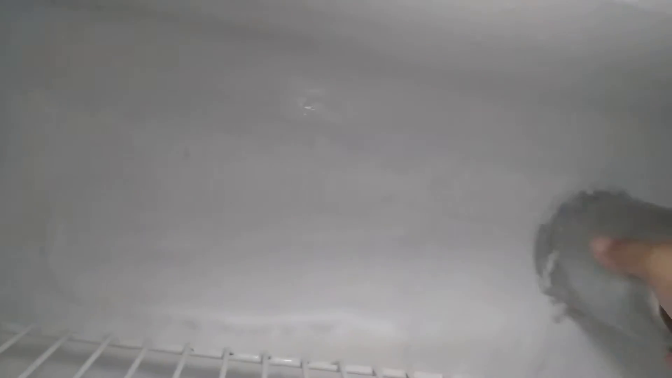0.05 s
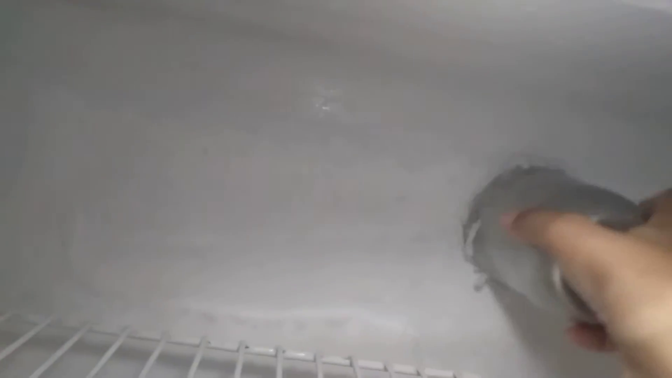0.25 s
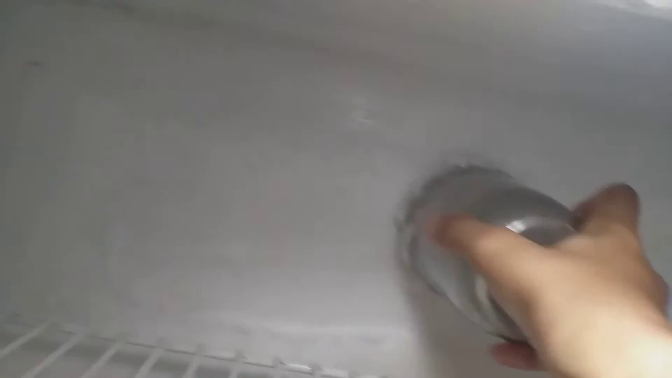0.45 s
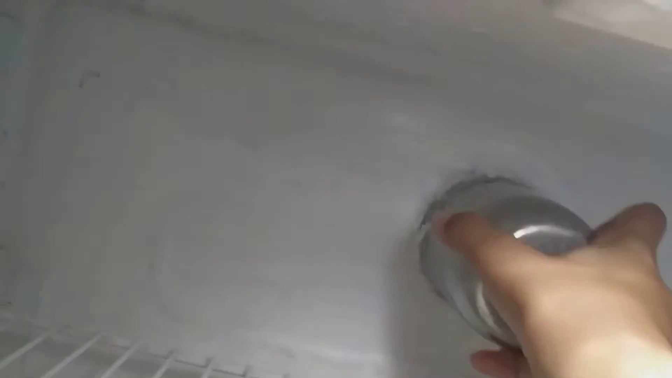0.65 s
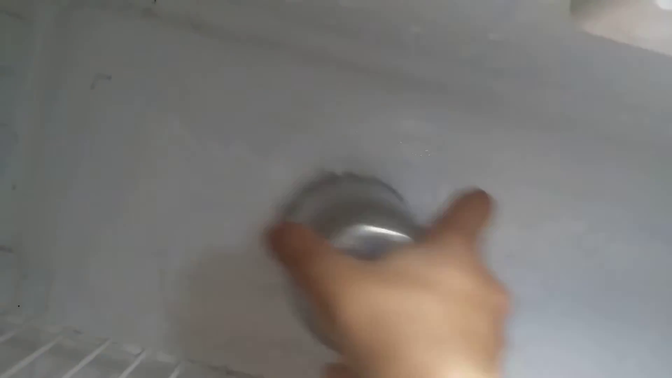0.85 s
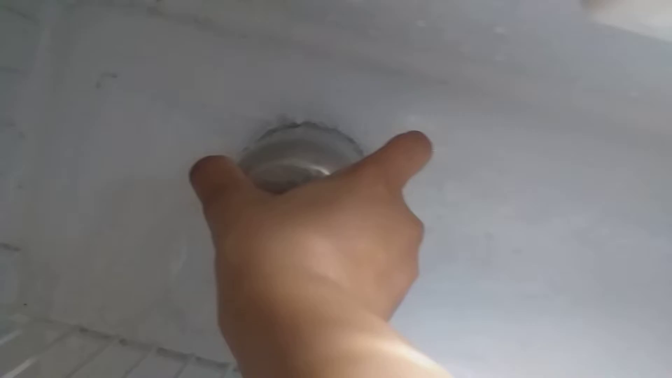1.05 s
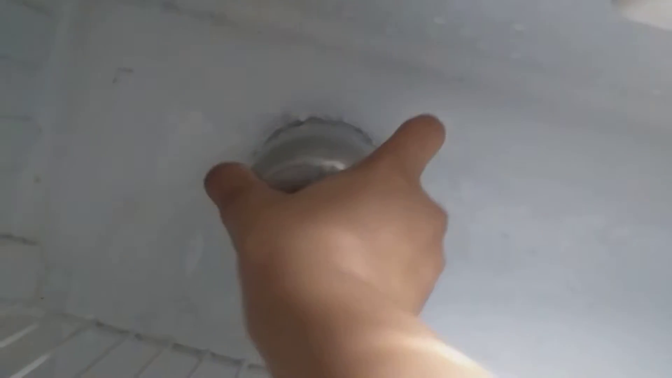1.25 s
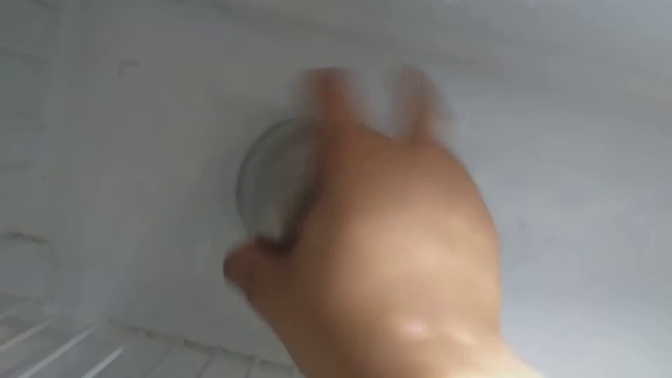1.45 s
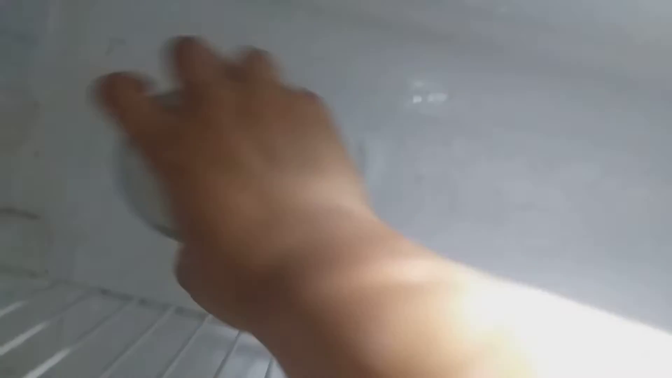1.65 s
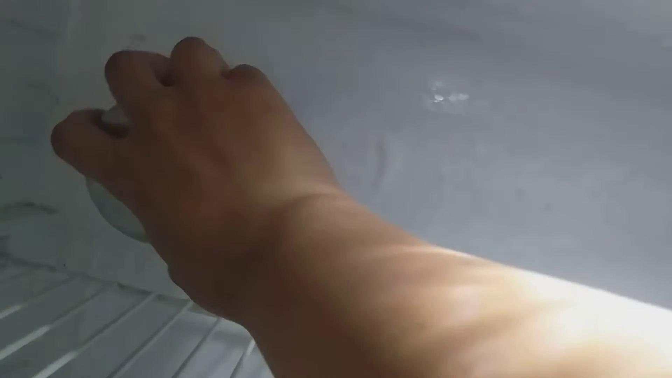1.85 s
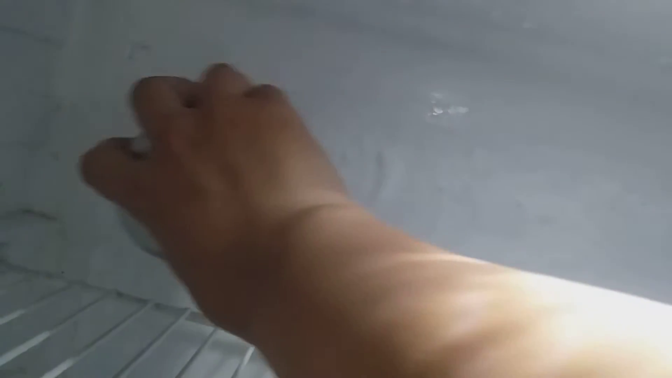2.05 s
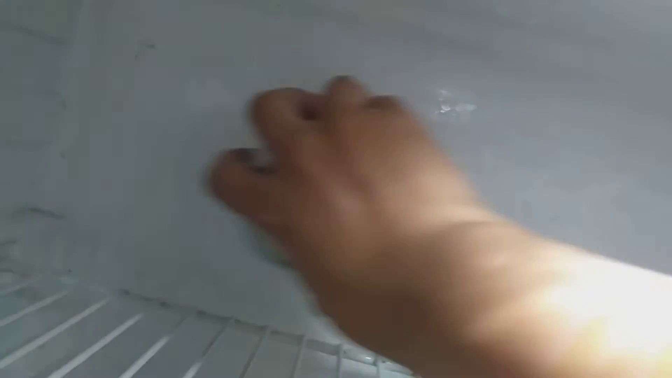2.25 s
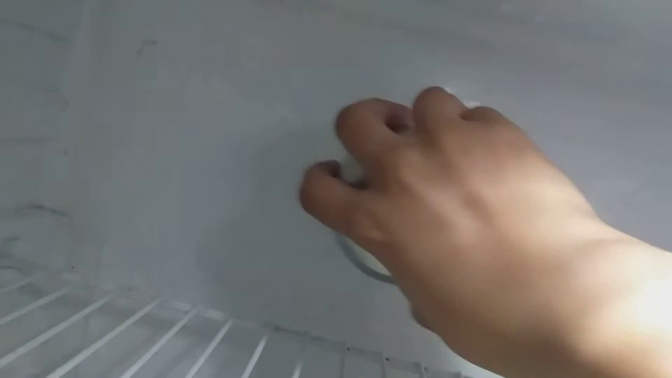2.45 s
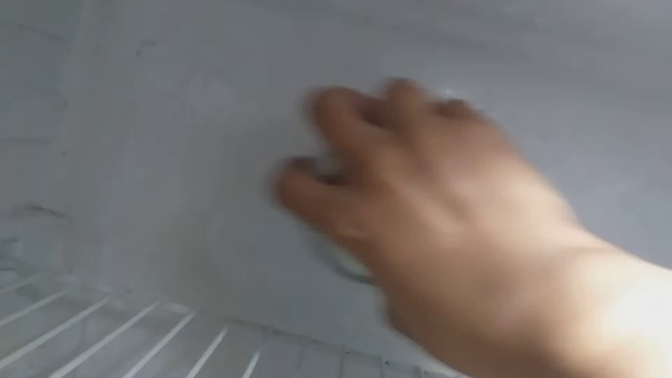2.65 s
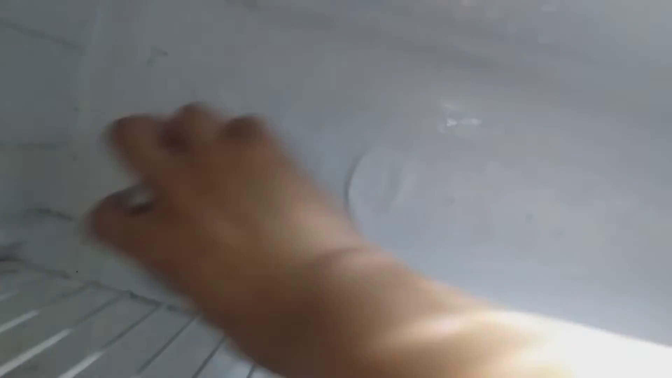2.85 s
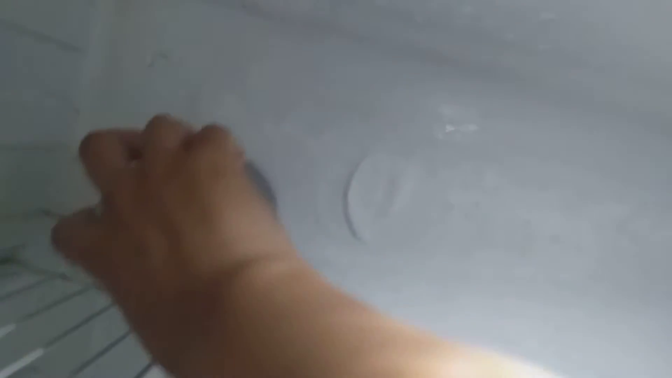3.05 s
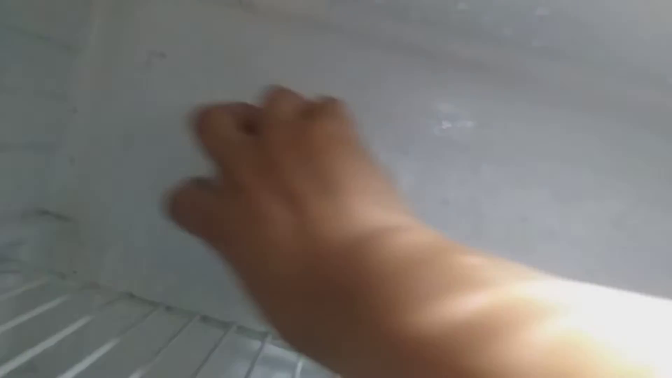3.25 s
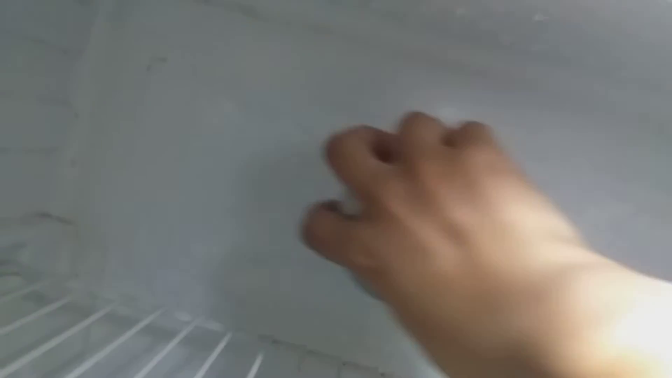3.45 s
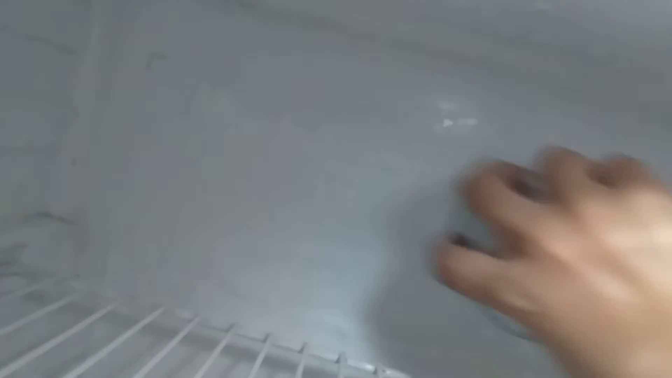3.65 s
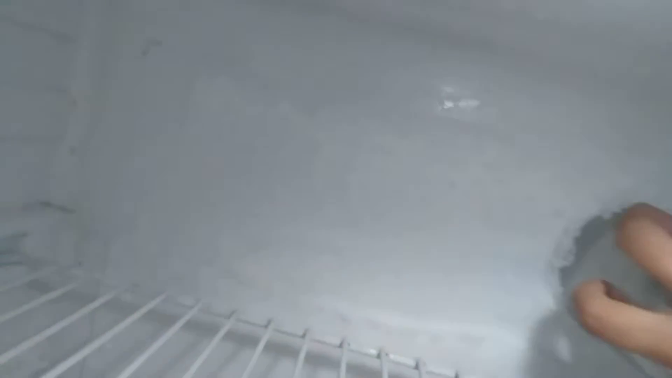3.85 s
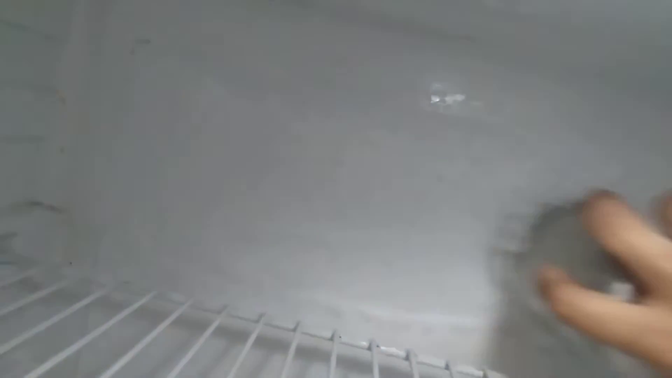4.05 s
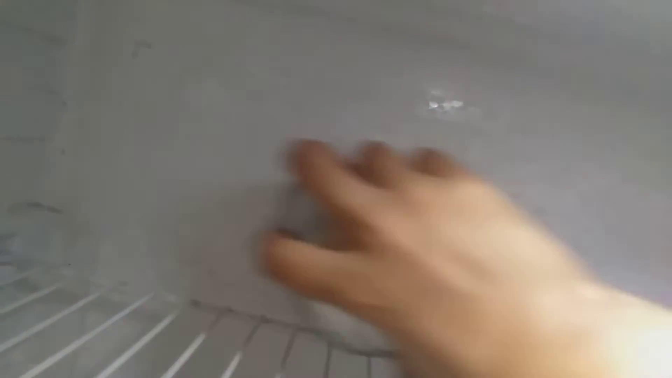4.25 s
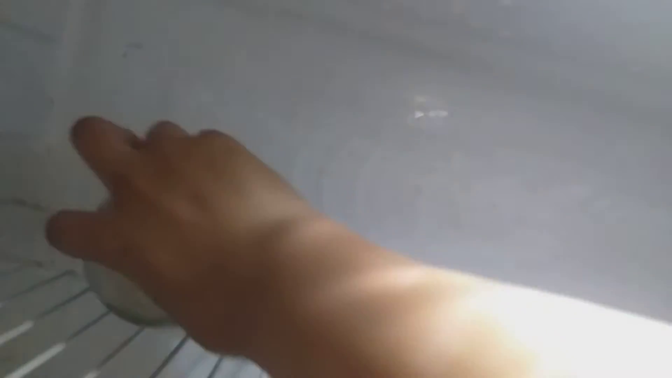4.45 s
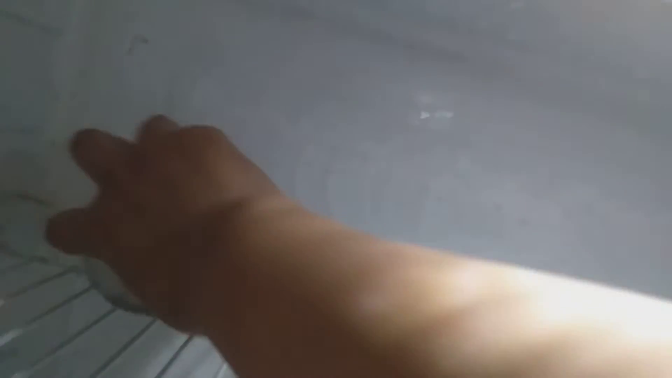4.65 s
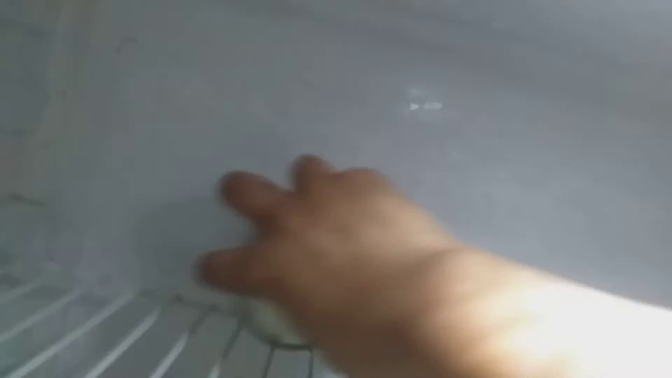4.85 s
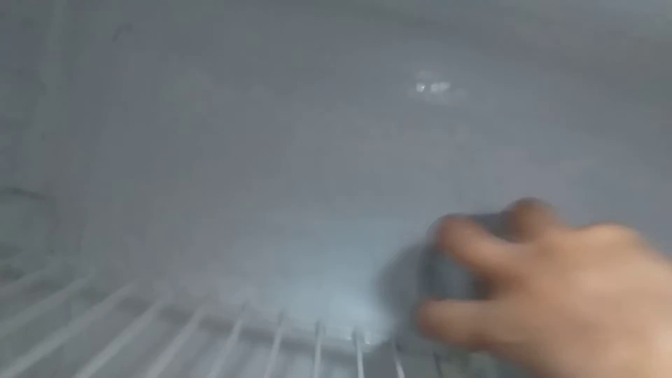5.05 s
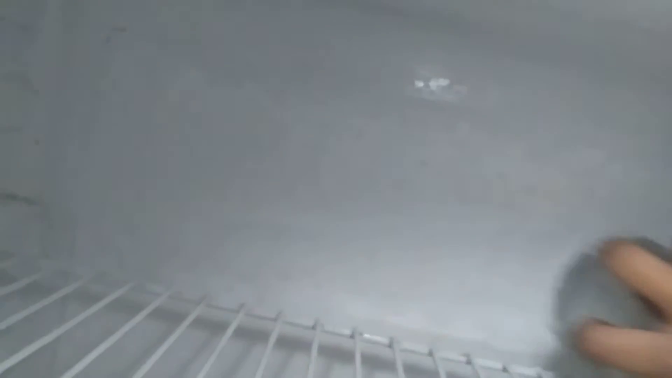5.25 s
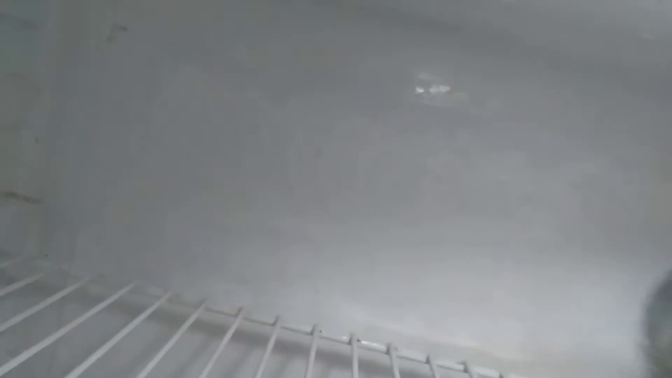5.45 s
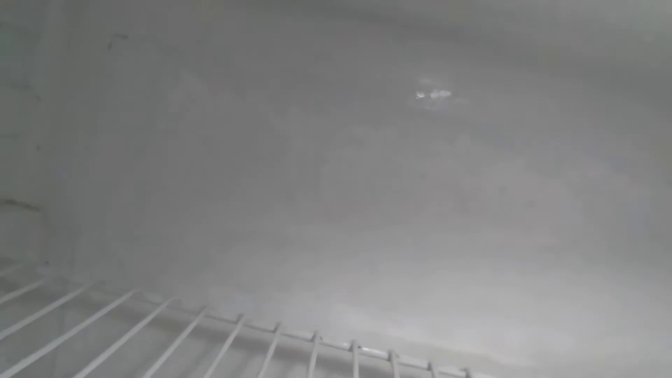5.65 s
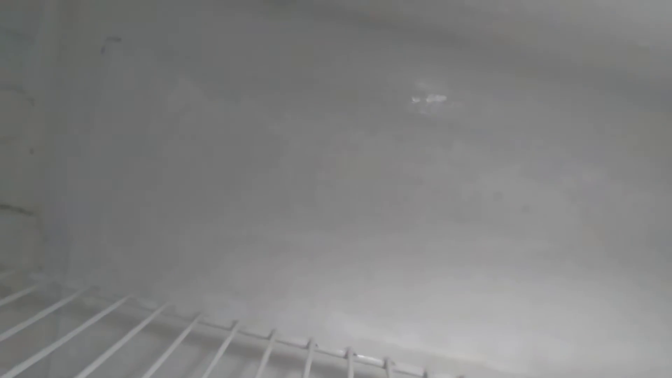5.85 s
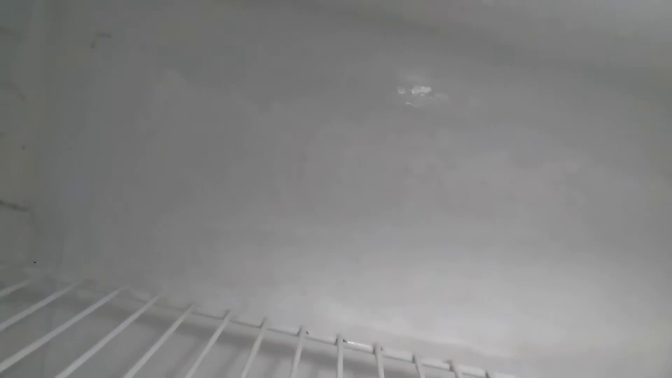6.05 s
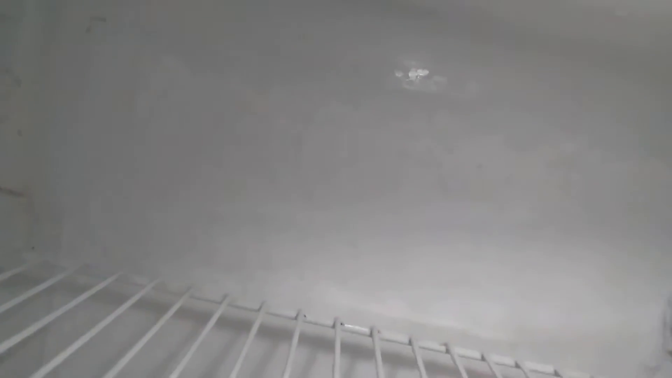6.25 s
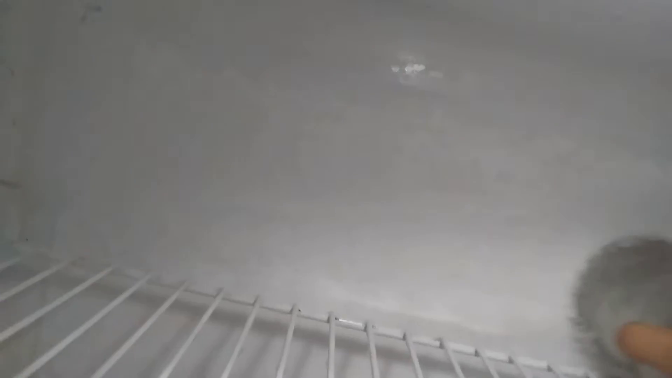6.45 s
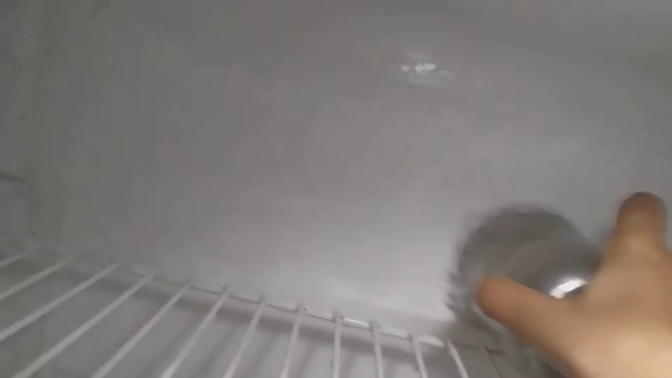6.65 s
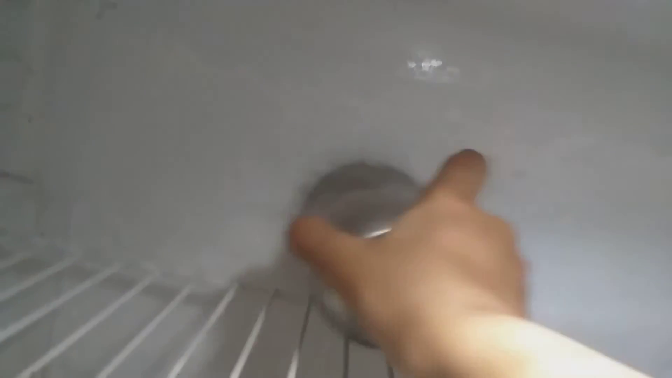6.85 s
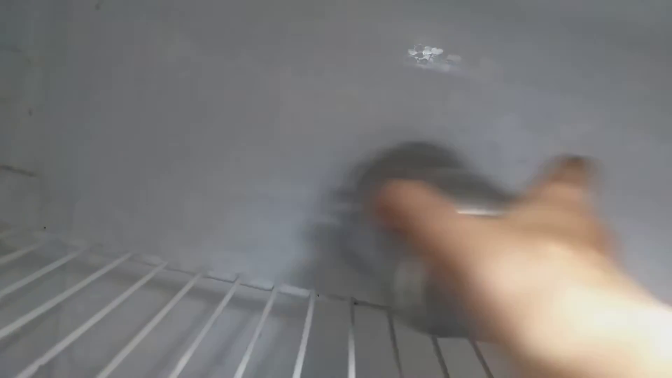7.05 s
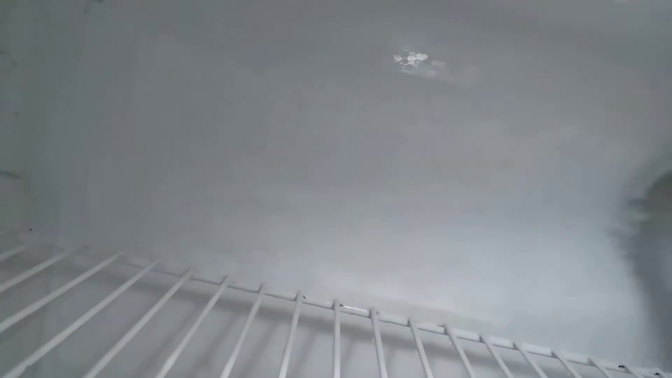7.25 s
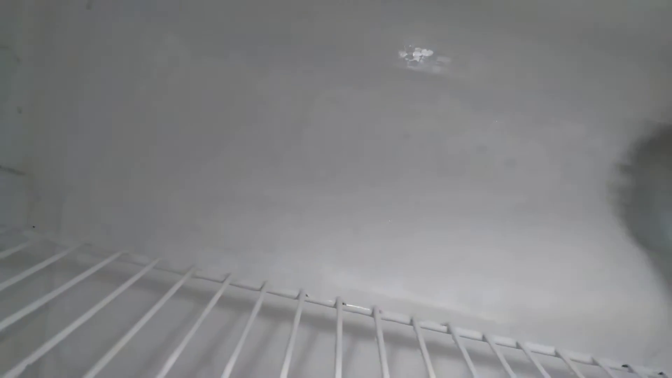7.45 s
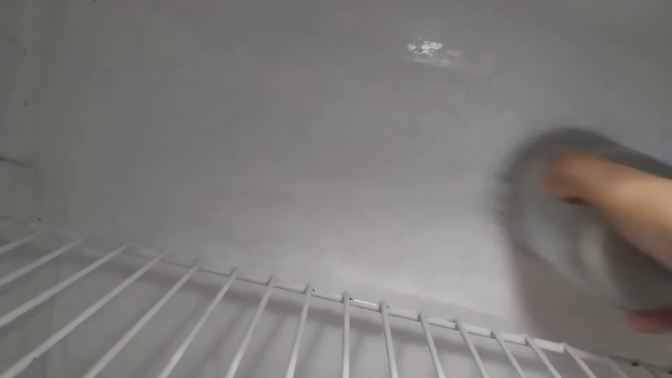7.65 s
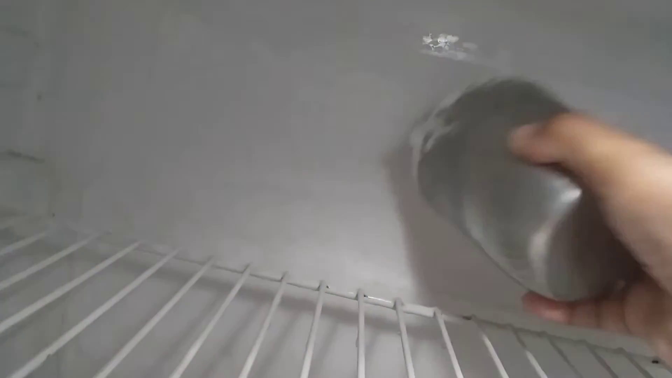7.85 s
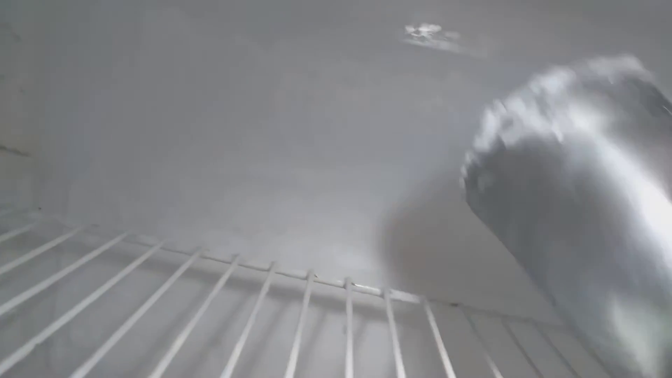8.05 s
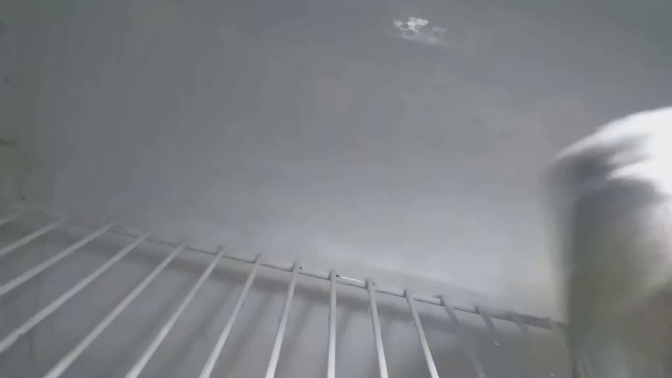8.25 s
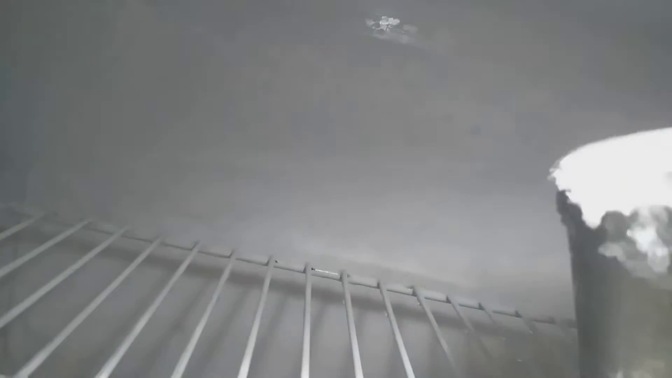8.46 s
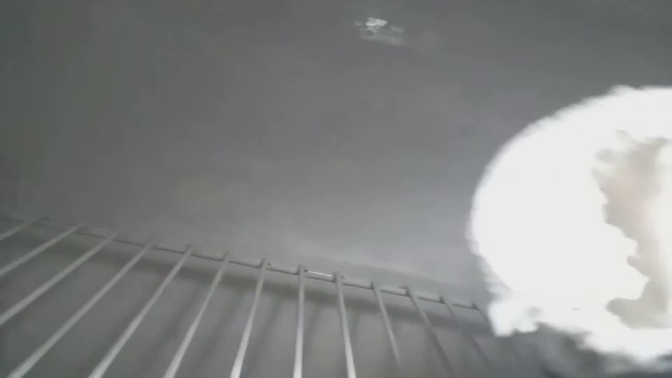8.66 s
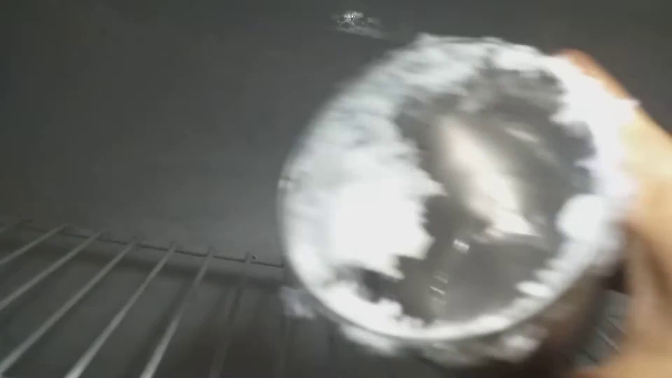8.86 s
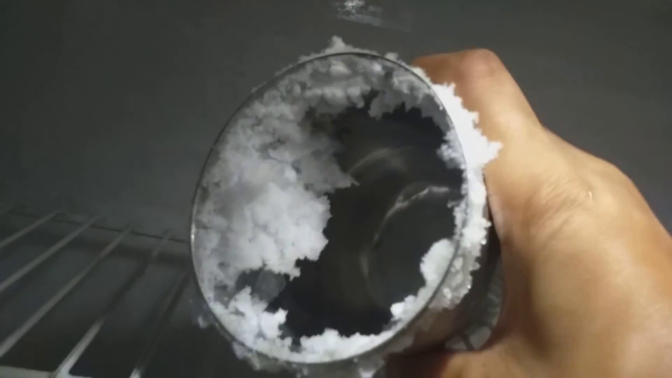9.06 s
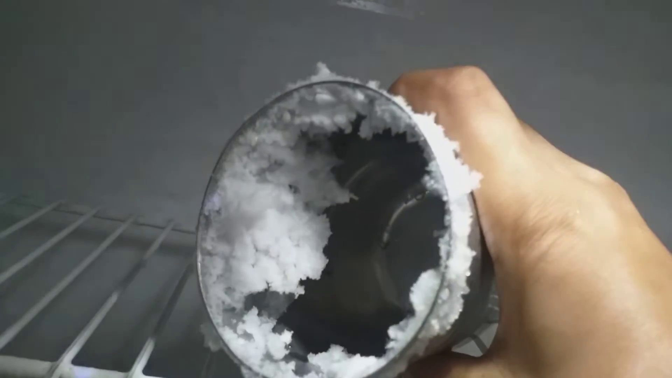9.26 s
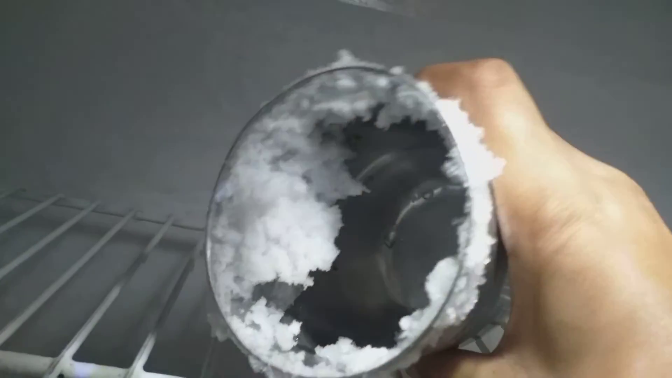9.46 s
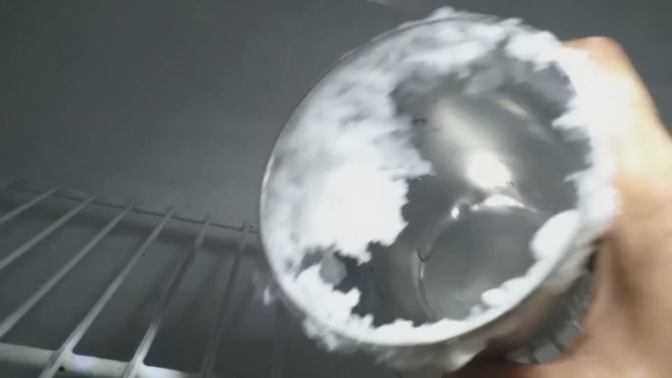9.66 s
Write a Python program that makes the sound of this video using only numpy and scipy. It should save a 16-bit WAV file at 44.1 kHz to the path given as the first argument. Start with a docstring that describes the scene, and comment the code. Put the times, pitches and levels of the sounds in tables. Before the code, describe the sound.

A metal cup scrapes frost from a freezer's inner wall, heard very close in a tight, reflective compartment with a faint dull room tail. From 0 to 1 s come short powdery crunches with hollow panel rumble, cracks and knocks. A bump at 1.7 s starts lighter, sparser rasping, with more scraping and a click or two near 2-2.6 s. Around 3-3.8 s a fuller crunchy stroke breaks into quick slips and a short high squeak at 3.5 s, then a thump. After a lull, brittle cracks at 4.4 s lead to the loudest, harshest scraping at 4.7-5.3 s. Smaller scrapes and bumps follow, then another strong crackling rasp at 6.2-6.9 s, with a thin squeak. Brief soft crunches and knocks at 7.3-7.8 s fade. Near 8.1-8.3 s faint finger taps make the cup ring slightly. Only low compressor hum and soft hiss remain, rising a little after 9 s.

```python
"""A metal cup is dragged over the frosted inner wall of a freezer, close to the microphone: random clicks
of crushed ice, heard directly and through the ringing modes of the cup. The rim sticks, slips and squeaks.
Friction and bumps excite the modes of the hollow plastic wall; bumps clack and finger taps ring the cup.
Noise tails echo it from compartment and kitchen, over compressor harmonics and hiss; the cup lifts off at the end."""
import sys
import numpy as np
from scipy import signal
from scipy.fft import rfft, irfft
from scipy.io import wavfile
from scipy.ndimage import uniform_filter1d, minimum_filter1d, map_coordinates

SR = 44100
rng = np.random.default_rng(int(sys.argv[2]) if len(sys.argv) > 2 else 0)


def output_pcm(signal):
    """Save a mono or channel-first signal as 16-bit PCM at the path in sys.argv[1].

    Samples are clipped to [-1, 1] before scaling.
    """
    pcm = np.clip(np.atleast_2d(signal).T, -1, 1) * 32767
    wavfile.write(sys.argv[1], SR, np.round(pcm).astype(np.int16))


N = 428211
T = np.arange(N) / SR  # time_s

# All table levels are relative.
# Pushes of the rim over the frost: start_s, rise_s, hold_s, fall_s, crunch_db, rumble_db,
# hardness (0 powder .. 1 glassy crust)
PUSHES = [(0.049, 0.05, 0.17, 0.21, -23, -19, 0.021), (0.381, 0.13, 0.027, 0.092, -21.5, -19, 0.13),
          (0.697, 0.076, 0.1, 0.21, -25.5, -15, 0.024), (0.946, 0.073, 0.02, 0.033, -29, -24, 0.033),
          (1.713, 0.04, 0.014, 0.073, -34.5, -32, 0.36), (2.006, 0.29, 0.2, 0.06, -26.5, -27.5, 0.4),
          (2.527, 0.051, 0.051, 0.06, -44.5, -44.5, 0.22), (2.97, 0.35, .13, .2, -23.5, -24, 0.39),
          (3.298, 0.13, 0.22, 0.31, -20.5, -16, 0.05), (4.408, 0.026, 0.0079, 0.047, -17, -42, 0.99),
          (4.645, 0.22, 0.21, 0.2, -17.5, -15.5, 1), (5.155, 0.033, 0.37, 0.12, -32.5, -35, 1),
          (5.686, 0.069, 0.014, 0.096, -38.5, -35.5, 1), (6.161, 0.043, 0.074, 0.26, -28, -24.5, 0.98),
          (6.452, 0.18, 0.19, 0.14, -22, -15.5, 0.93), (7.334, 0.017, 0.18, .05, -46.5, -56, .05),
          (7.472, 0.049, 0.026, 0.21, -26, -21.5, 0.054), (7.674, 0.052, 0.0047, 0.11, -31, -24, 0.15)]
# Rim breaks free and cracks the crust: start_s, level_db
SLIPS = [(0.222, -13.5), (0.33, -14.5), (0.513, -8.5), (0.548, -13.5), (0.717, -22), (0.774, -12),
         (0.936, -12), (1.429, -29.5), (2.284, -16.5), (2.494, -23), (2.975, -29), (3.332, -18),
         (3.456, -10), (3.473, -13.5), (3.487, -23), (3.523, -13.5), (3.563, -24), (3.704, -13),
         (4.411, -8.5), (4.431, -13), (4.47, -9), (4.516, -13), (4.688, -15), (4.771, -5.5), (4.868, -9),
         (4.915, -4.5), (4.956, 2.5), (4.994, -4), (5.031, -4), (5.067, -2), (5.142, -9.5), (5.195, -10.5),
         (5.262, -15), (5.322, -16.5), (5.554, -9.5), (5.592, -14), (5.752, -29), (5.95, -25.5),
         (6.215, -9), (6.273, -14.5), (6.414, -11), (6.504, -11), (6.561, -8.5), (6.607, -7), (6.661, -4),
         (6.705, -5), (6.742, -1.5), (6.783, -8), (6.825, -10.5), (7.509, -13), (7.876, -34.5),
         (7.993, -40), (8.029, -46)]
# Packed frost squeaks on metal: start_s, pitch_hz, level_db, swell_s
SQUEAKS = [(3.09, 1915, -26, 0.02), (3.523, 2690, -9, 0.0026), (3.561, 2820, -8, 0.004),
           (3.6, 2800, -14.5, 0.035), (6.759, 5450, -12.5, 0.04), (8.117, 2600, -46, 0.0043),
           (8.155, 4000, -47, 0.026)]
# Spectrum of soft frost giving way: freq_hz, level_db
POWDER_SPECTRUM = [(500, -17.5), (1100, -2), (1900, -1.5), (2900, 0), (3800, 0), (5100, -3), (6200, -5.5),
                   (7300, -7), (8000, -21.5), (9200, -27), (11300, -14)]
# Spectrum of hard crust giving way: freq_hz, level_db
CRUST_SPECTRUM = [(500, -42), (1100, -8.5), (1600, -0.5), (2300, 2.5), (3100, 3.5), (3700, -0.5),
                  (5200, 6.5), (7000, -7), (8000, -18.5), (9200, -31), (11300, -16)]
# Modes of the cup, damped by the hand: freq_hz, peak_db, t60_s
CUP_MODES = [(3120, -6, 0.015), (4500, -14, 0.078), (5010, 9, 0.021)]
# Cup bumps the wall: start_s, boom_db, tick_db, band_centre_hz
BUMPS = [(0.079, -20, -34, 215), (0.227, -15, -14, 188), (0.454, -20, -30, 385), (0.517, -4.5, -19, 340),
         (0.716, -27, -30, 320), (0.78, -5, -23, 320), (0.884, -15, -17, 426), (0.937, -12, -11, 320),
         (1.703, -9, -9, 532), (2.131, -14, -11, 474), (2.263, -23.5, -27, 182), (2.634, -40, -25.5, 400),
         (2.889, -26.5, -25, 228), (3.196, -20, -45, 267), (3.399, -20, -28.5, 297),
         (3.747, -7.5, -15, 308), (4.542, -18.5, -24, 227), (4.605, -22.5, -15.5, 263),
         (5.274, -14, -21, 340), (5.952, -30, -40, 340), (6.102, -30, -25, 360), (6.598, -12, -16, 336),
         (7.347, -14.5, -28.5, 326), (7.734, -18.5, -14.5, 320), (8.138, -42, -22, 418)]
# Modes of the wall panel and the air in front of it: freq_hz, peak_db, t60_s
WALL_MODES = [(103.2, 4.5, 0.3), (151.6, -3.5, 0.36), (168.6, 9, 0.14), (241.2, 1.5, 0.13),
              (279, 7.5, 0.12), (326.1, 9, 0.15), (380.5, 1.5, 0.13), (418.7, 3.5, 0.12),
              (482.4, 6.5, 0.22), (615, -1, 0.094), (751.6, -8.5, 0.027)]
# Fingers tick against the cup: start_s, level_db, band_centre_hz
FINGER_TAPS = [(8.114, -44, 10500), (8.305, -39.5, 5360)]
# Thin modes of the cup under a finger: freq_hz, peak_db, t60_s
RIM_MODES = [(5420, 21, 0.55), (7600, 2, 0.09), (8600, 2, 0.14), (12000, 8, 0.055)]
# Level of the background hum and hiss: time_s, hum_db, hiss_db
HUM_HISS_LEVELS = [(0, -31.5, -41), (1.3, -44.5, -48.5), (7.2, -42, -52.5), (8.2, -45.5, -50.5),
                   (8.8, -46, -49.5), (9.2, -36, -43.5), (9.5, -41.5, -44), (9.7, -37, -42)]
# Hum: harmonic (multiple of shaft rate), level_db
HUM_HARMONICS = [(1, -17.5), (2, -2), (3, -4)]
# Spectrum of the background air: freq_hz, level_db
AIR_SPECTRUM = [(30, -13.5), (70, 16), (200, 12.5), (420, 16), (650, 10), (1000, 4), (1800, 5.5), (4000, 1),
                (6200, -2), (8000, -29.5), (12000, -24.5)]

SWING_DB = 20  # gained over the rise of a push, lost over its fall
CRUNCH_EASE, RUMBLE_EASE = 2, 1.6  # curvature of rise and fall
RELEASE_S = 0.059  # extra decay time constant after the fall
TOUCH_CRUNCH_DB, TOUCH_RUMBLE_DB = -62, -55.5  # rim resting lightly between pushes
LIFT_S = 8.31  # light touch has faded out by now
# Small random slips: rate before crust rejects some, level over the crunch, scatter
CATCH_PER_S, CATCH_DB, CATCH_SCATTER_DB = 24, 0.5, 4
GRIP_SOFT_DB, GRIP_HARD_DB = 8, 10  # drop before a slip, on powder and on crust
KITCHEN_T60_S, KITCHEN_DB, KITCHEN_LO_HZ, KITCHEN_HI_HZ = 0.57, -19, 200, 4150
SHAFT_HZ = 49.2  # mean rate
TOP_HZ = 16200  # recorder cutoff


def undb(db):
    """Decibels to gain."""
    return 10 ** (np.asarray(db) / 20)


def unit(x):
    """Scale to rms 1."""
    return x / np.sqrt(np.mean(x ** 2))


def curves(table):
    """Table columns interpolated at every sample."""
    time_s, *columns = np.transpose(table)
    return [np.interp(T, time_s, column) for column in columns]


def play(x, response):
    """Convolve with a response scaled to unit energy."""
    return signal.fftconvolve(x, response / np.linalg.norm(response))[:N]


def colour(points, size=2048):
    """Minimum-phase response with a (Hz, dB) spectrum."""
    hz, db = np.transpose(points)
    bin_hz = np.arange(size // 2 + 1) * SR / size
    log_gain = np.log(undb(np.interp(np.log(bin_hz + 1), np.log(hz), db)))
    cepstrum = irfft(log_gain)
    cepstrum[1:size // 2] *= 2
    return irfft(np.exp(rfft(cepstrum[:size // 2], size)))


def ring(modes):
    """Response of decaying modes, each with its own gain at resonance."""
    t, out = T[:SR // 2], 0
    for hz, db, t60_s in modes:
        damping = np.log(1000) / t60_s
        gain = undb(db) * 2 * damping / SR
        out = out + gain * np.exp(-damping * t) * np.cos(2 * np.pi * hz * t)
    return out


def band(x, lo_hz, hi_hz, order=2):
    """Butterworth band-pass."""
    edges_hz = [lo_hz, min(hi_hz, .45 * SR)]
    return signal.sosfilt(signal.butter(order, edges_hz, "band", fs=SR, output="sos"), x)


def walk(rate_hz):
    """Smooth random wander, spread near 1."""
    k = max(int(SR / rate_hz), 2)
    steps = np.repeat(rng.standard_normal(N // k + 1), k)
    return 1.3 * uniform_filter1d(uniform_filter1d(steps, k), k)[:N]


def grains(rate_per_s, spread_db):
    """Breaking crystals: random clicks, most small and a few large; rms 1."""
    struck = rng.random(N) < rate_per_s / SR
    size = np.minimum(rng.exponential(size=N), np.log(100))
    return unit(struck * rng.standard_normal(N) * undb(spread_db * size))


def bursts(times_s, db, rise_s, decay_s):
    """Envelope of sudden releases that die away; large ones last longer."""
    t, out = T[:SR // 4], np.zeros(N + SR)
    for s, gain in zip(times_s, undb(db)):
        shape = (1 - np.exp(-t / rise_s)) * np.exp(-t / (decay_s * gain ** 0.21))
        start = max(int(s * SR), 0)
        out[start:start + len(t)] += gain * shape / shape.max()
    return out[:N]


def scraping():
    """The rim crushes crystals unevenly; each slip breaks many at once."""
    crunch_db, _ = pushes(CRUNCH_EASE)
    slip_s, crack_db = slips(crunch_db)
    hard = hardness()
    grip_db = GRIP_SOFT_DB + (GRIP_HARD_DB - GRIP_SOFT_DB) * hard
    sticking = grip(np.transpose(SLIPS)[0], depth_db=grip_db, hold_s=.016)
    crush_gain = undb(crunch_db - 1.07 + 2.66 * walk(200))
    crushing = grains(rate_per_s=5000, spread_db=4.0) * crush_gain * sticking
    crack_gain = bursts(slip_s, crack_db - 0.5, rise_s=0.0011, decay_s=0.0096)
    cracking = grains(rate_per_s=17000, spread_db=1.0) * crack_gain
    # larger pieces have less fizz at the top
    cracking = signal.lfilter(*signal.butter(1, 7500, fs=SR), cracking)
    force = crushing + cracking
    # powder sings in the cup; crust stays almost dry
    powder = cup(force * np.sqrt(1 - hard), POWDER_SPECTRUM, ring_db=4.5)
    crust = cup(force * np.sqrt(hard), CRUST_SPECTRUM, ring_db=-29)
    ice = flex(powder + crust, sway_s=.00013, rate_hz=70)
    ice = ice + squeaks(waver=.09, flutter_db=6)
    return compartment(ice, t60_s=0.11, echo_db=0.5)


def pushes(ease):
    """Crunch and rumble levels in dB: each push swells, holds and eases off to a light touch."""
    touching = np.clip((LIFT_S - T) / .1, 1e-3, 1)
    crunch, rumble = undb(TOUCH_CRUNCH_DB) * touching, undb(TOUCH_RUMBLE_DB) * touching
    for s, rise_s, hold_s, fall_s, crunch_db, rumble_db, _ in PUSHES:
        full_s = s + rise_s
        ease_s = full_s + hold_s
        slack = np.clip(np.maximum((full_s - T) / rise_s, (T - ease_s) / fall_s), 0, 10)
        released_s = np.maximum(T - ease_s - fall_s, 0)
        effort = undb(-SWING_DB * slack ** ease) * np.exp(-released_s / RELEASE_S)
        crunch = np.maximum(crunch, undb(crunch_db) * effort)
        rumble = np.maximum(rumble, undb(rumble_db) * effort)
    return 20 * np.log10(crunch), 20 * np.log10(rumble)


def hardness():
    """Frost hardness of each push, from just before it starts until the next."""
    start_s, *_, hard = np.transpose(PUSHES)
    current = np.maximum(np.searchsorted(start_s, T + .02) - 1, 0)
    return np.clip(hard[current], 0, 1)


def slips(crunch_db):
    """Times and levels of large slips, finger taps, and random small catches that grow with the push."""
    count = 400
    wait, scatter = rng.exponential(size=count), rng.standard_normal(count)
    s = np.cumsum(wait) / CATCH_PER_S
    catch_db = np.interp(s, T, crunch_db) + CATCH_DB + CATCH_SCATTER_DB * scatter
    catches = np.column_stack([s, catch_db])
    # catches need loose powder: hard crust holds until a large slip
    loose = rng.random(count) > np.interp(s, T, hardness(), right=1)
    return np.vstack([SLIPS, np.array(FINGER_TAPS)[:, :2], catches[loose]]).T


def grip(times_s, depth_db, hold_s):
    """The rim sticks, and so falls quieter, just before each slip."""
    wait_s = np.append(times_s, 2 * T[-1])[np.searchsorted(times_s, T)] - T
    return undb(-depth_db * np.exp(-wait_s / hold_s))


def cup(force, spectrum, ring_db):
    """Breaking ice is heard directly and through the ringing cup."""
    ice = colour(spectrum)
    response = undb(ring_db) * signal.fftconvolve(ice, ring(CUP_MODES))
    response[:len(ice)] += ice
    return play(force, response)


def flex(x, sway_s, rate_hz):
    """The cup flexes in the hand: a wandering time shift sways its resonances in pitch."""
    return map_coordinates(x, [(T + sway_s * walk(rate_hz)) * SR], mode="nearest")


def squeaks(waver, flutter_db):
    """Fast stick-slip of packed frost: rough tones, their pitch and level fluttering."""
    t, out = T[:SR // 4], np.zeros(N)
    wobble, flutter = walk(260) + walk(2000), np.tanh(walk(150))
    for s, hz, db, swell_s in SQUEAKS:
        span = slice(int(s * SR), int(s * SR) + len(t))
        shape = t / swell_s * np.exp(1 - t / swell_s)
        pitch_hz = hz * (1 + waver * wobble[span])
        tone = np.sin(2 * np.pi * np.cumsum(pitch_hz) / SR)
        out[span] += undb(db + flutter_db * flutter[span]) * shape * tone
    return out


def compartment(x, t60_s, echo_db, size=4096):
    """Dense echoes between close walls; their pattern changes as cup and arm move."""
    t, out = T[:2 * size], np.zeros(N + 4 * size)
    fade = np.sin(np.pi * np.arange(size) / size)
    padded = np.pad(x, size // 2)
    for start in range(0, N, size // 2):
        echoes = rng.standard_normal(len(t)) * np.exp(-np.log(1000) * t / t60_s)
        piece = padded[start:start + size]
        wet = signal.fftconvolve(piece * fade[:len(piece)], echoes / np.linalg.norm(echoes))
        out[start:start + len(wet)] += wet
    mixed = x + undb(echo_db) * out[size // 2:size // 2 + N]
    return mixed / np.hypot(1, undb(echo_db))


def ticks():
    """Each bump starts with a short, dry clack of the cup: band-passed noise."""
    s, _, tick_db, _ = np.transpose(BUMPS)
    clack = rng.standard_normal(N) * bursts(s, tick_db + 1.5, rise_s=0.000037, decay_s=0.0078)
    return band(clack, 450, 3560, order=3)


def finger_taps():
    """A finger tap leaves the cup ringing faintly; its band selects the modes it wakes."""
    out = 0
    for s, db, centre_hz in FINGER_TAPS:
        touch = rng.standard_normal(N) * bursts([s], [db], rise_s=0.0005, decay_s=0.014)
        touch = band(touch, centre_hz / np.sqrt(2), centre_hz * np.sqrt(2))
        out = out + play(touch, ring(RIM_MODES))
    return out


def wall():
    """Friction and slips shake the hollow panel, and bumps make it boom."""
    _, rumble_db = pushes(RUMBLE_EASE)
    slip_s, crack_db = np.transpose(SLIPS)
    sticking = grip(slip_s, depth_db=9, hold_s=.02)
    drag = undb(rumble_db + 3.27 + 2.3 * walk(35)) * sticking
    jerks = bursts(slip_s, crack_db - 12.0, rise_s=0.0028, decay_s=0.059)
    shaking = grains(rate_per_s=500, spread_db=0.45) * np.hypot(drag, jerks)
    out = play(shaking, band(ring(WALL_MODES), 101.8, 787, order=6))
    for s, boom_db, _, centre_hz in BUMPS:
        boom = bump(centre_hz, thud_db=-1.0, thud_s=0.032, damping_s=0.43)
        start = int(s * SR)
        out[start:start + len(boom)] += undb(boom_db - 12.5) * boom
    return out


def bump(centre_hz, thud_db, thud_s, damping_s):
    """A dull noise thud plus wall modes in random phase, damped further by the resting cup."""
    t, modes = T[:SR // 2], 0
    for hz, db, t60_s in WALL_MODES:
        decay = np.exp(-np.log(1000) * t / t60_s)
        modes = modes + undb(db) / t60_s * decay * np.sin(2 * np.pi * (hz * t + rng.random()))
    thud = rng.standard_normal(len(t)) * np.exp(-t / thud_s)
    blow = unit(modes * np.exp(-t / damping_s)) + undb(thud_db) * unit(thud)
    return unit(band(blow, centre_hz / 1.88, centre_hz * 1.465, order=3))


def kitchen(x):
    """A faint, dull tail from the room outside: decaying band-passed noise."""
    t = T[:SR]
    tail = rng.standard_normal(SR) * np.exp(-np.log(1000) * t / KITCHEN_T60_S)
    return undb(KITCHEN_DB) * play(x, band(tail, KITCHEN_LO_HZ, KITCHEN_HI_HZ))


def compressor():
    """Shaft harmonics that waver a little, over a soft hiss of air."""
    hum_db, hiss_db = curves(HUM_HISS_LEVELS)
    turns = np.cumsum(SHAFT_HZ * (1 + 0.0043 * walk(4.7))) / SR
    hum = 0
    for harmonic, db in HUM_HARMONICS:
        gain = undb(db + 2.0 * walk(15.0))
        hum = hum + gain * np.sin(2 * np.pi * (harmonic * turns + rng.random()))
    hiss = play(rng.standard_normal(N), colour(AIR_SPECTRUM))
    return unit(hum) * undb(hum_db) + unit(hiss) * undb(hiss_db + 0.45 * walk(18))


def scene():
    """Cup, wall, room and compressor at one microphone."""
    near = scraping() + ticks() + finger_taps() + wall()
    return (near + kitchen(near) + compressor())[None]


def limiter(x, ceiling, hold_s):
    """Turn the gain down around peaks that pass the ceiling."""
    k = int(hold_s * SR)
    gain = np.minimum(1, ceiling / (np.abs(x) + 1e-9))
    return x * uniform_filter1d(minimum_filter1d(gain, k), k)


def record(dry):
    """The recorder limits the loudest peaks and cuts the top."""
    held = limiter(dry, ceiling=.95, hold_s=.006)
    return signal.sosfilt(signal.ellip(10, .2, 70, TOP_HZ, fs=SR, output="sos"), held)


dry = scene()
out = record(dry)
output_pcm(out)
```